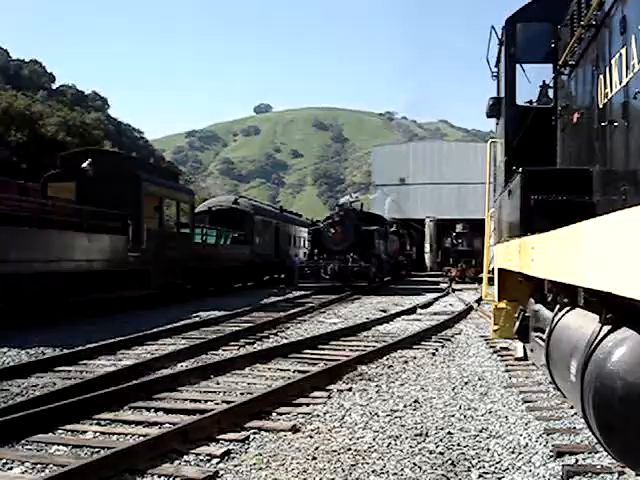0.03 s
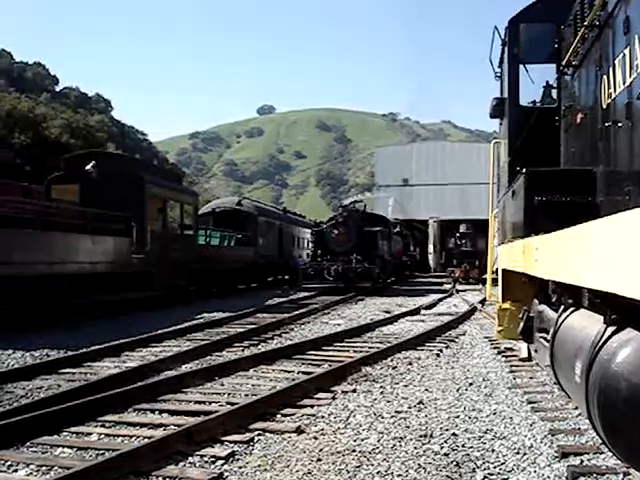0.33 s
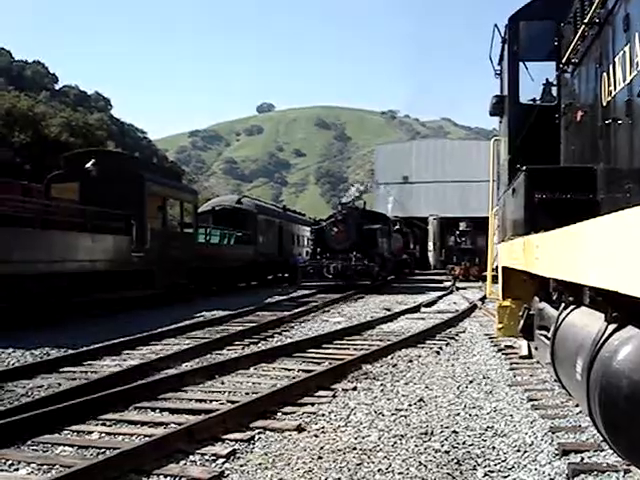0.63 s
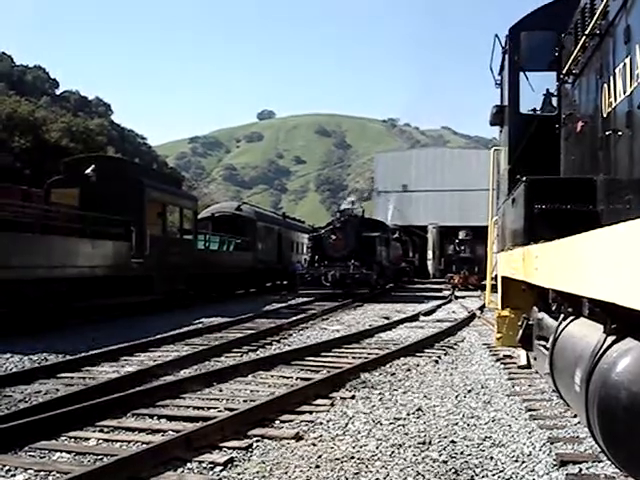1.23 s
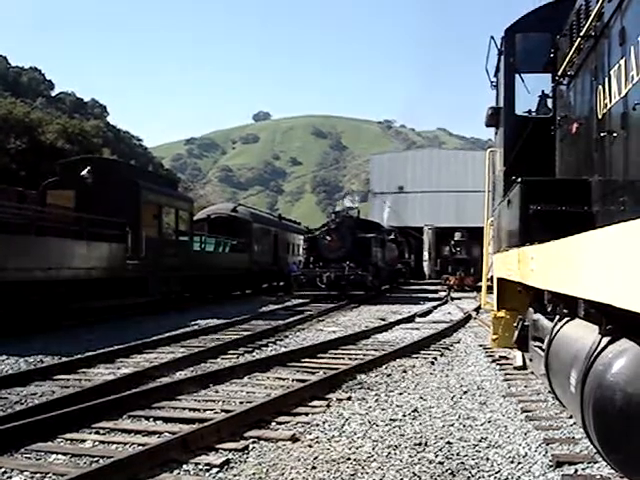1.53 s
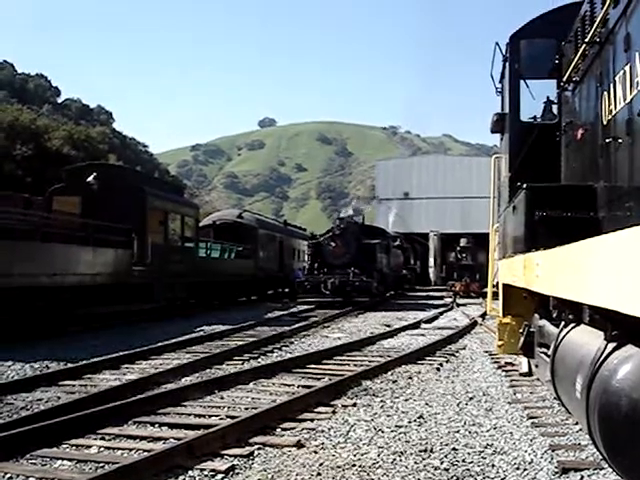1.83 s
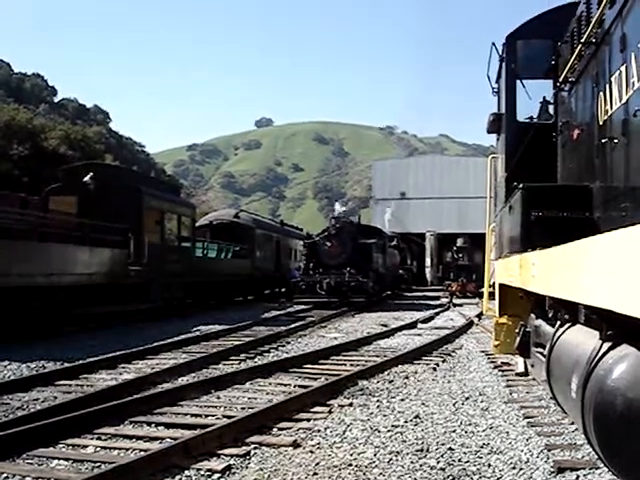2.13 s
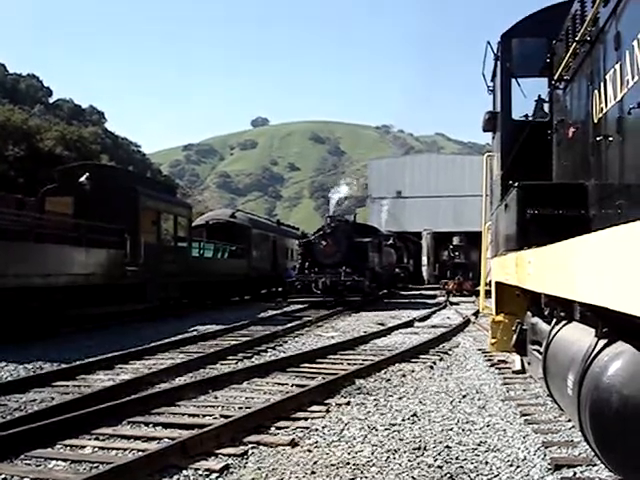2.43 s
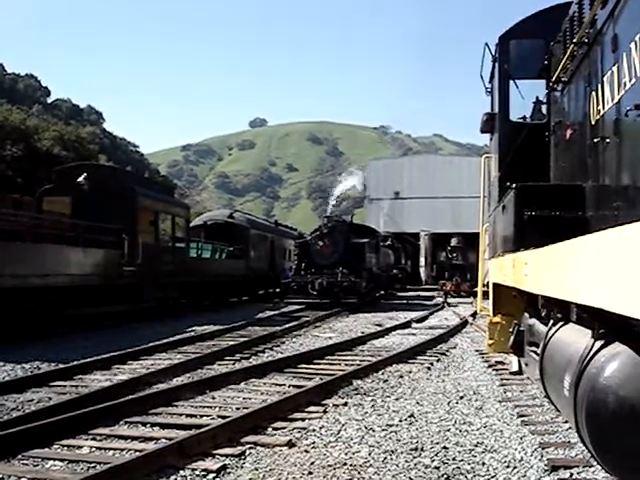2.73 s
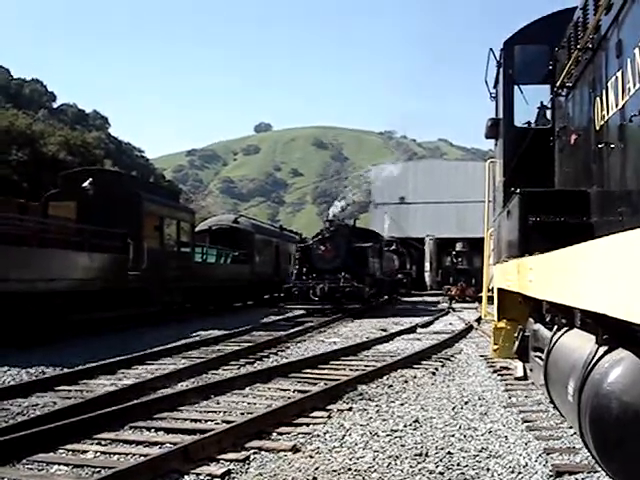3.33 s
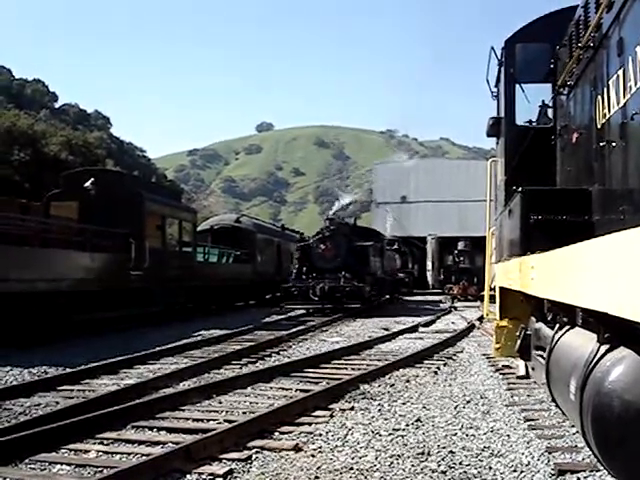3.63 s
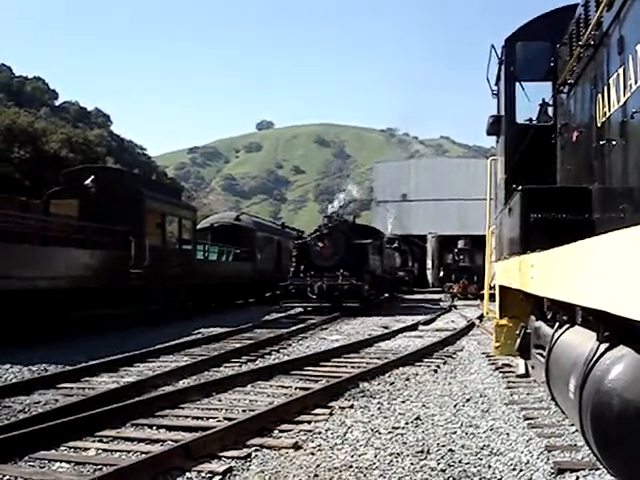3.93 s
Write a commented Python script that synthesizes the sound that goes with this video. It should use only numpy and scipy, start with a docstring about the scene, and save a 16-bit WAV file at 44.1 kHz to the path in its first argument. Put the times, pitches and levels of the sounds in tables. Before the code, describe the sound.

A locomotive's brass bell clangs at about 0.4, 0.8, 1.8, 2.6 and 3.4 seconds, its ring wavering and echoing across a rail yard. Steam hisses throughout over a faint idling throb and thin whine. Soft low microphone thumps come at the start, and steam spits at 0.5 seconds. Chuffs follow near 2, 2.9 and 3.7 seconds, with a faint falling metal squeak around 3.3.

```python
"""Steam locomotive ringing through a rail yard

The swinging brass bell is struck five times; cars and sheds throw it back with Doppler shifts.
Steam hisses, spits and chuffs, an idling engine throbs, a generator whines, metal squeaks once.
The camera's gain control steps with soft low thumps, ducks the yard at each stroke, then recovers."""
import sys
import numpy as np
from scipy import signal
from scipy.fft import rfft, irfft
from scipy.io import wavfile
from scipy.ndimage import uniform_filter1d

SR = 44100
rng = np.random.default_rng(int(sys.argv[2]) if len(sys.argv) > 2 else 0)


def generate_wav(sig):
    """Save sig (samples, or channels by samples) to the path in sys.argv[1] as 16-bit PCM at SR."""
    pcm = np.round(np.clip(np.atleast_2d(sig).T, -1, 1) * 32767).astype(np.int16)
    wavfile.write(sys.argv[1], SR, pcm)


N = 176400
T = np.arange(N) / SR


def amp(db):
    """Decibels to gain."""
    return 10 ** (np.asarray(db) / 20)


def unit(x):
    """Scale to rms 1."""
    return x / np.sqrt(np.mean(abs(x) ** 2) + 1e-20)


def curve(points):
    """Gain over time from (time [s], level [dB]) points."""
    return amp(np.interp(T, *np.transpose(points)))


def lobes(rows):
    """Gain over time of brief Gaussian dips and swells."""
    return amp(sum(db * np.exp(-((T - at_s) / width_s) ** 2) for at_s, width_s, db in rows))


def drift(width_hz):
    """Low-passed random wander, rms 1."""
    lowpass = np.exp(-(np.fft.rfftfreq(N, 1 / SR) / width_hz) ** 2)
    return unit(irfft(rfft(rng.standard_normal(N)) * lowpass, N))


def noise(spectrum, patch_db=1.65):
    """Slightly patchy noise, rms 1, coloured by (frequency [Hz], density [dB]) points."""
    bins_hz = np.fft.rfftfreq(2048, 1 / SR)
    hz, db = np.transpose(spectrum)
    colour_db = np.interp(np.log(bins_hz + 1), np.log(hz), db)
    real, imag, patches = rng.standard_normal((3, N // 512 + 5, len(bins_hz)))
    patches = unit(uniform_filter1d(uniform_filter1d(patches, size=6, axis=0), size=24, axis=1))
    frames = (real + 1j * imag) * amp(colour_db + patch_db * patches)
    return unit(signal.istft(frames.T, nperseg=2048, noverlap=1536)[1][:N])


def struck(at_s, hold_s, t60_s, rise_s):
    """Envelope: linear rise, hold, exponential decay."""
    age_s = np.maximum(T - at_s, 0)
    return np.minimum(age_s / rise_s, 1) * amp(-60 * np.maximum(age_s - hold_s, 0) / t60_s)


def swung_partial(hz, level, echo_share, flutter):
    """One bell partial: direct sound, echoes each Doppler-shifted by the swing, and a diffuse wash."""
    swing_s, swing_m_per_s, sound_m_per_s = 1.6, 1.066, 343
    echo_count, wash_width_hz = 8, 58
    swing_rad_per_hz = swing_m_per_s * swing_s / sound_m_per_s * np.sin(2 * np.pi * T / swing_s)
    delays_s = np.linspace(0.018, 0.15, echo_count)
    direction_cosines = rng.permutation(np.linspace(-1, 1, echo_count))
    echoes = 0
    for delay_s, cosine in zip(delays_s, direction_cosines):
        late_level = np.interp(T - delay_s, T, level)
        doppler_rad = hz * cosine * np.interp(T - delay_s, T, swing_rad_per_hz)
        detune_turns = rng.random() + rng.normal(0, 4) * T
        echoes += late_level * np.exp(1j * (doppler_rad + 2 * np.pi * detune_turns))
    direct = np.exp(0.25j * hz * swing_rad_per_hz)
    wash = flutter * 0.23 * (drift(wash_width_hz) + 1j * drift(wash_width_hz))
    envelope = level * (direct + wash) + echo_share * echoes / np.sqrt(echo_count)
    envelope *= amp(flutter * 1.44 * drift(22))
    return np.sqrt(2 * np.mean(level ** 2)) * (unit(envelope) * np.exp(2j * np.pi * hz * T)).real


def bell():
    """Clapper on brass: three long-ringing partials, a loud clang, beating upper modes, clink and tick."""
    # long-ringing partials as the bell swings (time [s], level [dB])
    hum_level = [(0.1, -28), (0.3, -40), (0.48, -42), (0.72, -23.5), (0.86, -35), (1.0, -28), (1.33, -28.5),
                 (1.42, -36.5), (1.55, -28.5), (1.84, -39.5), (2.2, -26), (2.42, -22), (2.58, -34),
                 (2.9, -31), (3.17, -22), (3.46, -35), (3.7, -21.5), (3.97, -23.5)]
    tierce_level = [(0.1, -34.5), (0.45, -30.5), (0.8, -24.5), (0.92, -39), (1.02, -16.5), (1.28, -38.5),
                    (1.39, -22.5), (1.52, -32), (2.3, -32.5), (2.68, -28), (2.82, -15.5), (2.94, -25),
                    (3.04, -12), (3.15, -26.5), (3.33, -25.5), (3.54, -15.5), (3.86, -24), (3.97, -17)]
    shimmer_level = [(.1, -30), (.17, -34.5), (.28, -22), (.38, -31.5), (.55, -29), (.7, -32.5), (.9, -33),
                     (1.4, -32), (1.75, -27), (2.0, -29.5), (2.3, -26.5), (2.6, -29), (2.85, -36),
                     (3.0, -26.5), (3.35, -29), (3.6, -34.5), (4, -33.5)]
    # clapper strokes, the first before time 0 (time [s], clang [dB], upper modes [dB], clang hold [s],
    # extra at bite_hz [dB], upper t60 factor [-], tick [dB])
    strokes = [(-.6, -5.5, 8.5, .2, 1, 1.09, -20), (0.389, -8, -0.5, 0.089, -4, 0.85, -20),
               (0.836, -14, 1, 0.36, 0.5, 1.19, -15), (1.794, -11, -0.5, 0.23, -1, 1.35, -21),
               (2.552, -8, -0.5, 0.37, 4, 1.05, -19), (3.395, -10, -1, 0.31, -8, 0.93, -22)]
    # swing dips and swells of the clang and the bright mode (time [s], half width [s], gain [dB])
    clang_lobes = [(.872, .012, -12.5), (.905, .016, -4), (1.075, 0.026, 5), (1.17, .03, -9.5),
                   (1.899, .014, -6.5), (2.018, 0.0097, -16), (2.105, 0.022, -11.5), (2.675, 0.022, -10.5),
                   (2.745, 0.028, -6.5), (2.789, 0.016, -14.5), (3.62, 0.019, -14.5), (3.68, 0.019, -18),
                   (3.8, 0.02, -5.5)]
    bright_lobes = [(.97, 0.023, 5.5), (1.25, .04, -5.5), (2.272, 0.055, 10.5), (2.76, 0.11, 6)]
    # upper modes (frequency [Hz])
    upper_hz = [1214, 2342, 3254, 3924, 4888, 5381, 6947, 8570]
    # per upper mode (level [dB], base t60 [s], rise [s], beat rate [Hz], beat depth [0-1], crest [s])
    upper_modes = [(-34.5, 5.06, .02, 2.1, 0.2, .06), (-36.5, 2.6, 0.0025, 8.6, .3, .02),
                   (-20, 0.75, .004, 9.3, 0.54, 0.034), (-20, 1.96, 0.0056, 12.45, 0.16, 0.066),
                   (-33, 0.57, 0.0027, 14, 0.1, 0.015), (-24, 1.4, 0.0017, 12, 0.35, 0.072),
                   (-31.5, 0.95, .002, 21, 0.27, 0.024), (-45.5, 3.2, .01, 13, 0.8, 0.023)]
    # clapper tick (frequency [Hz], density [dB])
    tick_spectrum = [(300, -17), (1500, -8), (2500, -4), (4500, 10), (6500, 4.5), (10000, -33)]
    hum_hz, tierce_hz, clang_hz, bite_hz, bright_hz, shimmer_hz = 729.4, 1558, 2629, 3254, 3924, 4241
    attack_s, extra_decay_db_per_s, tail_db = 0.0013, 14, -16
    clink_hz, clink_width_hz, clink_db, clink_decay_s, tick_decay_s = 2800, 300, -18, 0.023, 0.0041

    out = swung_partial(hum_hz, curve(hum_level), echo_share=0.11, flutter=0.25)
    out += swung_partial(tierce_hz, curve(tierce_level), echo_share=0.35, flutter=0.56)
    out += swung_partial(shimmer_hz, curve(shimmer_level), echo_share=0.41, flutter=1.0)
    mode_db, t60_s, rise_s, beat_hz, depth, crest_s = np.transpose(upper_modes)[:, :, None]
    mode_hz = np.array(upper_hz)[:, None]
    hold_share = 0.27 * (mode_hz > bite_hz)
    clang_power, upper_power, clink_level, tick_level = 0, 0, 0, 0
    for at_s, clang_db, upper_db, hold_s, bite_db, t60_factor, tick_db in strokes:
        age_s = np.maximum(T - at_s, 0)
        clang = struck(at_s, hold_s, t60_s=0.72, rise_s=attack_s)
        clang *= amp(clang_db - extra_decay_db_per_s * age_s)
        tail = amp(clang_db + tail_db) * struck(at_s, hold_s=0, t60_s=4.3, rise_s=attack_s)
        clang_power += clang ** 2 + tail ** 2
        strength = amp(upper_db + mode_db + bite_db * (mode_hz == bite_hz))
        beat = 1 + depth * np.cos(2 * np.pi * beat_hz * (age_s - crest_s))
        ring = struck(at_s, hold_s * hold_share, t60_s * t60_factor, rise_s)
        upper_power += (strength * beat * ring) ** 2
        attack = np.minimum(age_s / attack_s, 1)
        clink_level += attack * np.exp(-age_s / clink_decay_s)
        tick_level += amp(tick_db) * attack * np.exp(-age_s / tick_decay_s)
    out += swung_partial(clang_hz, np.sqrt(clang_power) * lobes(clang_lobes), echo_share=0.15, flutter=0.7)
    for hz, power in zip(upper_hz, upper_power):
        swell = lobes(bright_lobes) if hz == bright_hz else 1
        out += swung_partial(hz, np.sqrt(power) * swell, echo_share=0.31, flutter=1.13)
    resonance = signal.iirpeak(clink_hz, clink_hz / clink_width_hz, SR)
    clink = unit(signal.lfilter(*resonance, rng.standard_normal(N)))
    return out + amp(clink_db) * clink_level * clink + tick_level * noise(tick_spectrum)


def steam():
    """Escaping steam: steady hiss, one sharp spit, a thin singing tone."""
    # steam noise (frequency [Hz], density [dB])
    hiss_spectrum = [(25, -10), (60, -21), (110, -20.5), (150, -12.5), (230, -14), (400, -14.5),
                     (650, -2.5), (1000, -4), (1300, -5), (1700, 4), (2050, -5), (2550, 5), (3000, -2),
                     (3700, -2.5), (4300, -2), (5000, -3.5), (6300, -5.5), (8000, -8), (10000, -20.5)]
    spit_spectrum = [(200, -16), (800, -4.5), (1700, -1.5), (3000, 3), (4500, 2.5), (6000, -0.5),
                     (8000, -3.5), (10000, -10.5)]
    # hiss and singing tone (time [s], level [dB])
    hiss_level = [(0, -25), (.38, -24.5), (.65, -23.5), (1.0, -25), (1.5, -24), (2.45, -25), (2.75, -22.5),
                  (3.3, -23), (3.55, -23.5), (4, -24)]
    singing_level = [(.1, -33.5), (.35, -30), (.6, -34.5), (1.2, -35.5), (2.5, -46), (3.5, -33), (4, -37)]
    spit_db, singing_hz = -12, 3665
    spit = amp(spit_db) * struck(at_s=0.478, hold_s=0.021, t60_s=0.25, rise_s=0.0043) * noise(spit_spectrum)
    singing = np.sqrt(2) * curve(singing_level) * np.sin(2 * np.pi * singing_hz * T + 0.61 * drift(4))
    return curve(hiss_level) * noise(hiss_spectrum) + spit + singing


def engine(throb_hz=13.8, throb_depth=0.15):
    """Throbbing rumble of an engine at idle."""
    # rumble (frequency [Hz], density [dB])
    spectrum = [(60, -21), (110, -4.5), (145, -6.5), (200, 0.5), (280, -5), (400, -1), (520, -4.5),
                (800, 6.5), (1200, 2), (2500, -18)]
    # rumble (time [s], level [dB])
    level = [(.1, -32.5), (.35, -30.5), (.6, -38.5), (1.0, -40.5), (1.7, -36.5), (2.1, -41), (2.5, -36.5),
             (2.8, -49), (3.2, -36), (3.5, -45), (4, -41)]
    throb = np.sin(2 * np.pi * throb_hz * T + 0.29 * drift(1.5))
    return curve(level) * (1 + throb_depth * throb) * noise(spectrum)


def generator(waver_depth=0.092):
    """Thin, wavering whine of the turbine generator."""
    # whine tones (frequency [Hz], level [dB])
    tones = [(147, -54.5), (866, -46.5), (1473, -43.5), (1591, -42), (1650, -43.5), (1708, -41.5),
             (2121, -49.5), (2412, -41.5)]
    out = 0
    for hz, db in tones:
        waver = 1 + waver_depth * drift(17)
        out += np.sqrt(2) * amp(db) * waver * np.sin(2 * np.pi * hz * T + 0.5 * drift(3))
    return out


def gain_thumps():
    """Soft low thumps as the gain control steps: DC pulses with a slight undershoot."""
    # thumps (time [s], time scale [s], gain [dB])
    thumps = [(.079, 0.0054, -22), (0.272, 0.0033, -20.5), (0.386, 0.022, -13)]
    out = 0
    for at_s, scale_s, db in thumps:
        age = np.maximum(T - at_s, 0) / scale_s
        out += amp(db) * (1 - np.exp(-4 * age)) * (1 - age / 4) * np.exp(-age / 2)
    return out


def chuffs(sputter_db=1.4, sputter_hz=110):
    """Stack exhaust: sputtering rushes with a lingering hollow body; the last rings and whistles."""
    # puffs (time [s], rise [s], rush decay [s], rush [dB], body [dB])
    puffs = [(1.969, 0.052, 0.11, -20, -35.5), (2.909, 0.083, 0.071, -14, -29),
             (3.649, 0.046, 0.08, -15.5, -34)]
    # exhaust noise (frequency [Hz], density [dB])
    rush_spectrum = [(100, -17.5), (400, -10), (800, -1.5), (1700, -6), (3000, -1.5), (3700, -3), (4400, 1),
                     (4900, -7.5), (6000, -5.5), (8000, -13), (10000, -22.5)]
    body_spectrum = [(40, -30.5), (100, -21.5), (170, 4), (350, -2.5), (550, 4.5), (900, 1.5), (2000, -8.5),
                     (6000, -55.5)]
    # low resonances and whistle (time [s], half width [s], frequency [Hz], pitch wander [-], level [dB])
    tones = [(3.78, .08, 188, .02, -37.5), (3.755, 0.042, 294, 0.017, -31.5),
             (3.722, 0.033, 8300, .014, -28)]
    rush = noise(rush_spectrum) * amp(sputter_db * drift(sputter_hz))
    body = noise(body_spectrum)
    out = 0
    for at_s, rise_s, decay_s, rush_db, body_db in puffs:
        rise = np.clip((T - at_s) / rise_s, 0, 1)
        decay = np.exp(-np.maximum(T - at_s - rise_s, 0) / decay_s)
        out += amp(rush_db) * rise * decay * rush
        out += amp(body_db) * struck(at_s, hold_s=0.15, t60_s=0.44, rise_s=rise_s) * body
    for at_s, width_s, hz, wander, db in tones:
        phase_rad = 2 * np.pi * np.cumsum(hz * (1 + wander * drift(130))) / SR
        out += amp(db) * np.exp(-((T - at_s) / width_s) ** 2) * np.sin(phase_rad)
    return out


def squeak():
    """Rubbing metal: a faint, falling tone."""
    # glide (time [s], length [s], start [Hz], end [Hz], level [dB])
    glides = [(3.258, 0.145, 1110, 1022, -27)]
    out = 0
    for at_s, length_s, start_hz, end_hz, db in glides:
        progress = np.clip((T - at_s) / length_s, 0, 1)
        phase_rad = 2 * np.pi * np.cumsum(start_hz + (end_hz - start_hz) * progress) / SR
        out += amp(db) * np.sin(np.pi * progress) * np.sin(phase_rad + 0.5 * drift(60))
    return out


def scene():
    """The whole yard, mono."""
    return (bell() + steam() + engine() + generator() + gain_thumps() + chuffs() + squeak())[None]


def record(dry):
    """The microphone opens; gain control ducks fast and recovers slowly; a low-pass follows."""
    open_s, fade_s, cutoff_hz = 0.079, 0.0036, 10150
    threshold_db, slope, sense_s, attack_s, detector_fall_db_per_s = -17.5, 0.8, 0.011, 0.0025, 5
    mic = dry[0] * np.clip((T - open_s) / fade_s, 0, 1)
    power_db = 10 * np.log10(abs(uniform_filter1d(mic ** 2, int(sense_s * SR))) + 1e-12)
    fall_db = T * detector_fall_db_per_s
    held_db = np.maximum.accumulate(power_db + fall_db) - fall_db
    over_db = np.maximum(held_db - threshold_db, 0)
    pole = np.exp(-1 / (attack_s * SR))
    duck_db = slope * signal.lfilter([1 - pole], [1, -pole], over_db)
    lowpass = signal.firwin(511, cutoff_hz, window=("kaiser", 9), fs=SR)
    return signal.oaconvolve(mic / amp(duck_db), lowpass, "same")[None]


dry = scene()
out = record(dry)
generate_wav(out)
```